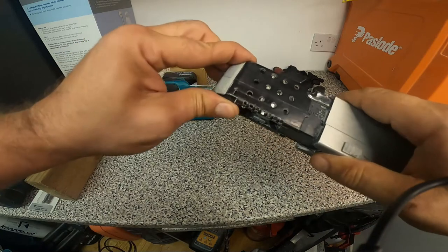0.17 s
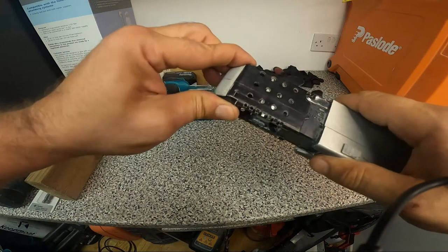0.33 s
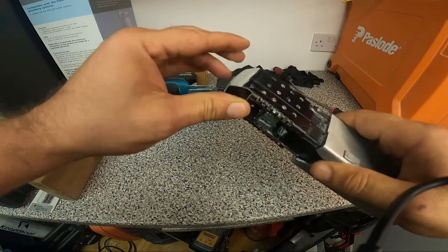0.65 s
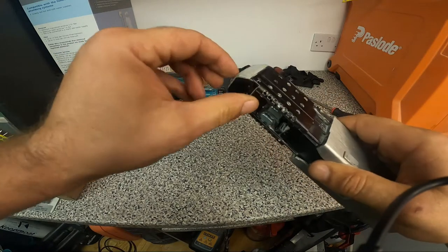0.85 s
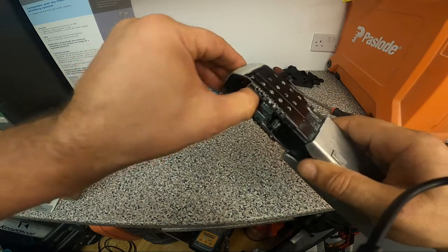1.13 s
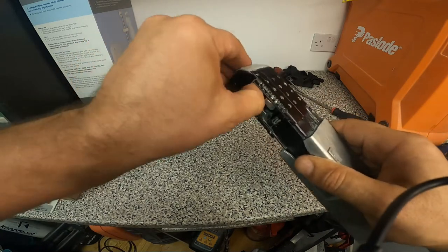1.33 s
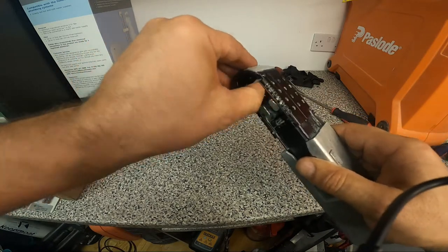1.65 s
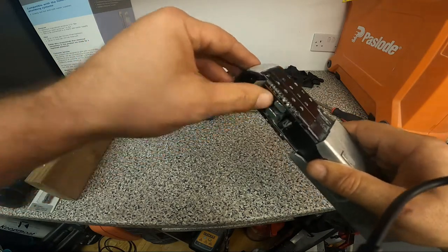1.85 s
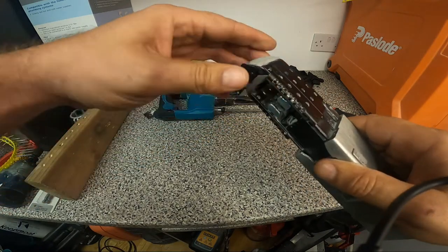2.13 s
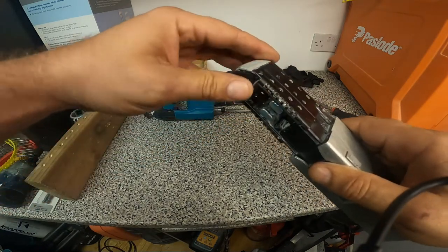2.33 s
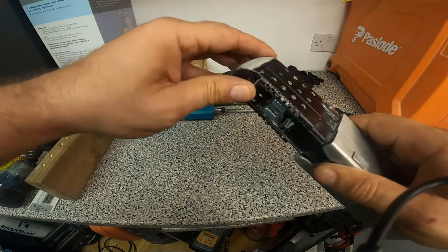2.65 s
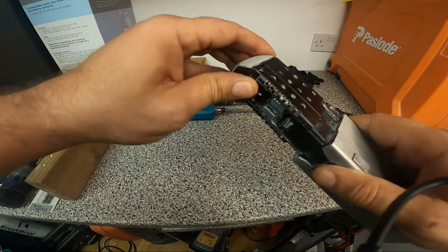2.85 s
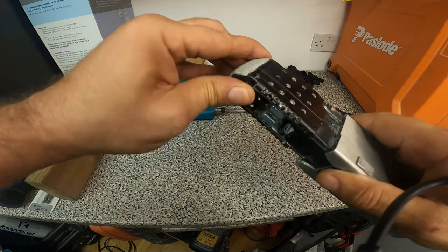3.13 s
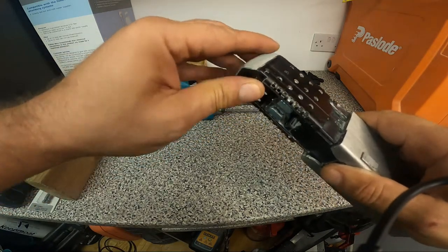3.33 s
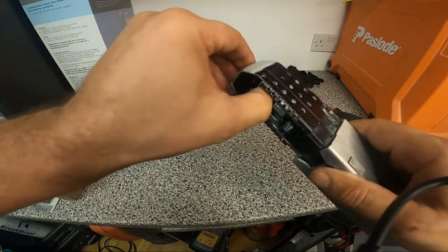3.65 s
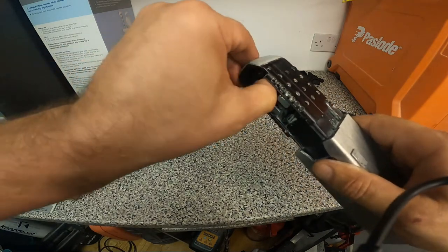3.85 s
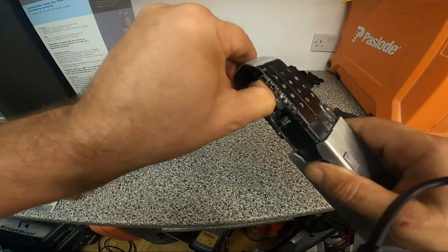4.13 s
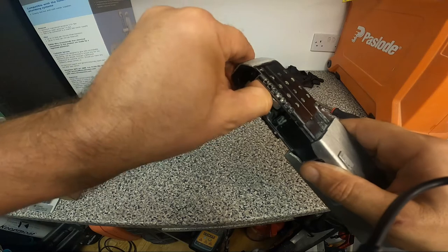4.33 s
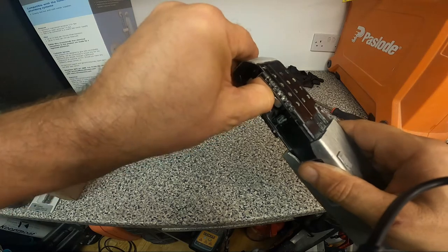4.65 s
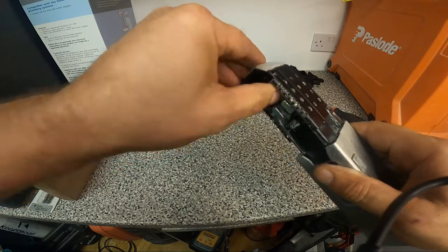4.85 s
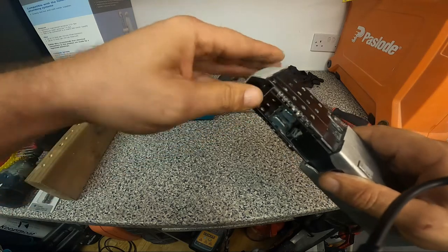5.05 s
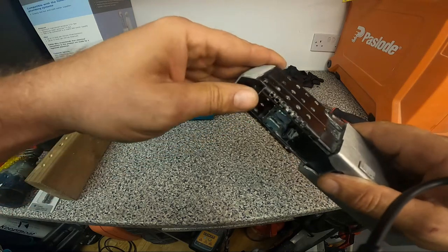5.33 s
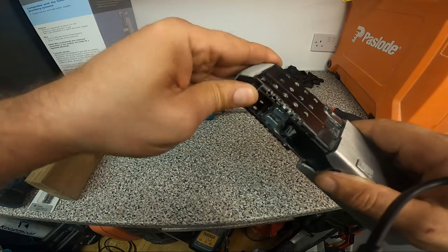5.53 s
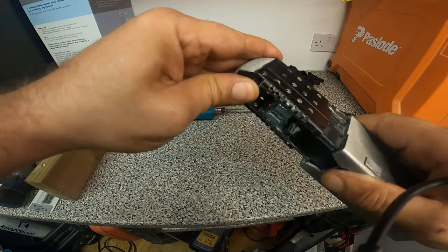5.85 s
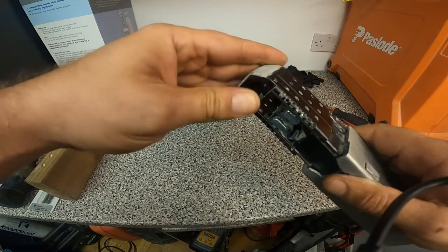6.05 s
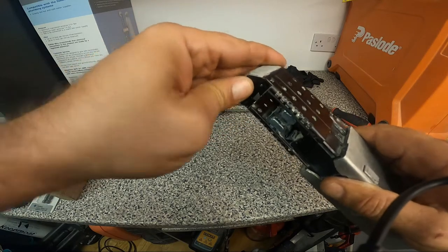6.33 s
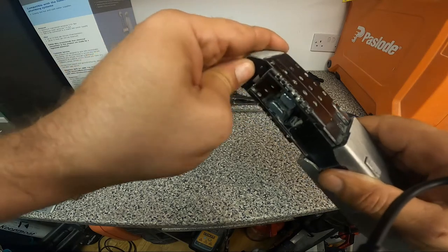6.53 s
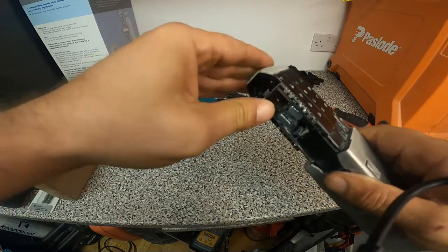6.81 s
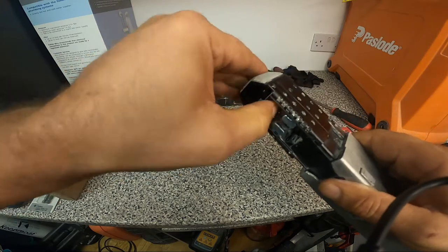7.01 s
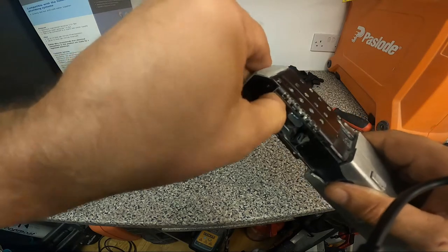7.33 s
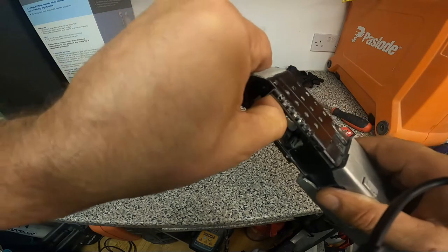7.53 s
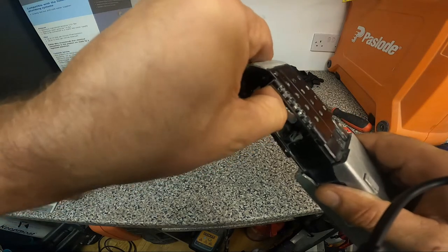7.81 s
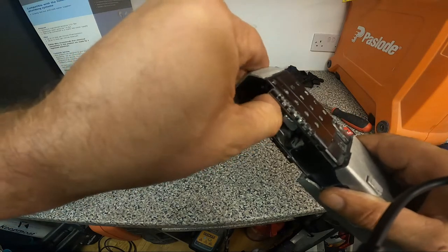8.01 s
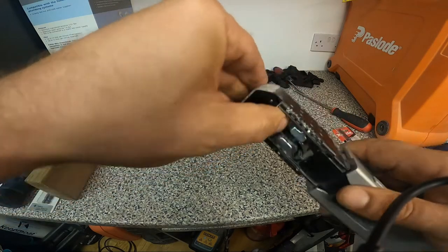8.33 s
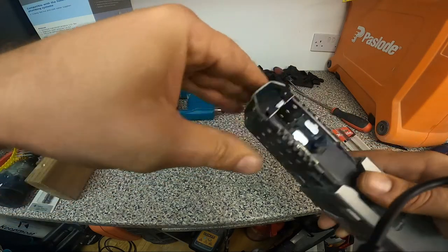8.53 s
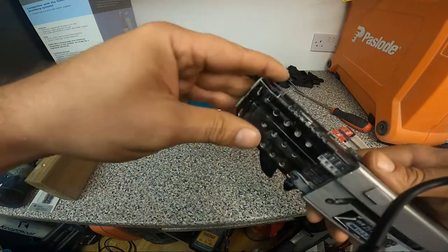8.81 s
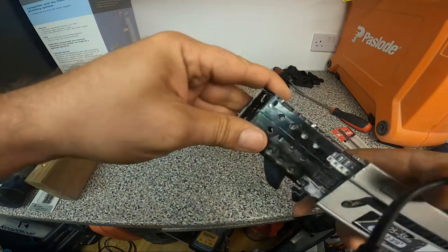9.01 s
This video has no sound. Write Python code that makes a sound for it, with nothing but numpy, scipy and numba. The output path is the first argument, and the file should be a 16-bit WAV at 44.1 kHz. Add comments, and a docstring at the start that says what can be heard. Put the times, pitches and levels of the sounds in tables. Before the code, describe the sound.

Close plastic clicks, taps and short scrapes as hands work a part into a tool housing, with a few sharp snaps over faint hum.

```python
"""A small workshop hums, with low rumble and a faint whine, while hands rub a tool housing close by.
A plastic part is worked into it: impacts excite the housing's modes as clicks and snaps, and stick-slip
friction excites them as scrapes. A loose pin pings, and a thin tone swells into each of the two biggest
snaps; a spring rings after the first, a low thump comes with the second. An automatic gain control
lowers the whole sound after loud snaps."""
import sys
import numpy as np
from scipy import signal
from scipy.fft import rfft, irfft, next_fast_len
from scipy.io import wavfile
from scipy.ndimage import uniform_filter1d
from numba import njit

SR = 44100
rng = np.random.default_rng(int(sys.argv[2]) if len(sys.argv) > 2 else 0)


def transcribe(signal):
    """Save signal, clipped to [-1, 1], as a 16-bit WAV file at the path in sys.argv[1]."""
    frames = np.atleast_2d(signal).T
    limited = np.clip(frames, -1, 1)
    pcm = np.round(limited * 32767).astype(np.int16)
    wavfile.write(sys.argv[1], SR, pcm)


N = 404389
T = np.arange(N) / SR

# Room hum and hiss: (frequency [Hz], relative spectral density [dB])
ROOM_SPECTRUM = [(12, -31.5), (20, -1.5), (48, -10), (93, -14.5), (172, 1.5), (247, -2.5), (915, -20),
                 (1210, -18), (4250, -29), (5160, -28.5), (5700, -33), (7800, -33), (8500, -38),
                 (15800, -51)]
# Course about which the rumble surges: (time [s], level [dB])
RUMBLE_LEVELS = [(0.0, -54.5), (1.81, -68), (1.94, -49.5), (2.6, -80.5), (2.93, -68.5), (3.06, -42),
                 (3.17, -67.5), (4.16, -49.5), (4.21, -61.5), (5.95, -53.5), (6.03, -70), (6.23, -50),
                 (7.05, -47.5), (7.15, -66), (7.59, -49), (7.69, -55), (9.04, -59.5), (9.17, -75)]
# Harmonics of the whine: (frequency [Hz], mean level [dB])
WHINE_PARTIALS = [(5190, -82), (10380, -104.5)]
# Hands shifting their grip: (time [s], level [dB])
GRIP_LEVELS = [(0.0, -66.5), (0.76, -86.5), (1.17, -65.5), (2.2, -80.5), (2.5, -89), (2.99, -63.5),
               (3.24, -90), (3.7, -69.5), (4.6, -76), (5.08, -61.5), (5.4, -76.5), (6.45, -73), (6.72, -66),
               (7.2, -64.5), (8.3, -77), (8.5, -64), (8.84, -56.5), (9.17, -75)]
# Normal modes of the housing: (frequency [Hz], relative level [dB], T60 [s])
HOUSING_MODES = [(224, 8, 0.036), (459, 3, 0.053), (636.3, -1.5, 0.072), (1096.3, -7, 0.04),
                 (1184.6, -2.5, 0.034), (1263.4, 2.5, 0.023), (1584, 1, 0.0077), (1788, 13.5, 0.0089),
                 (2095, -0.5, 0.019), (2326.4, -7, 0.016), (2661, -2, 0.0097), (2884, 3, 0.0072),
                 (3233, 0.5, 0.011), (3609, 0, 0.011), (3895, -1, 0.0089), (5130, -13.5, .006),
                 (5238, 3.5, 0.011), (5620, 16, 0.0031), (6100, -13, 0.015), (6400, -12.5, 0.0013),
                 (8100, 0.5, 0.0021), (8420, 2.5, 0.0027), (10486, 0, 0.0033), (12250, -2.5, 0.0026),
                 (13000, -1.5, 0.0018), (14600, -2.5, .0015)]
# Plastic striking plastic; shell, crack and thud are bands of the housing's modes:
# (time [s], level [dB], shell gain [dB], crack gain [dB], thud gain [dB], chatter decay [ms])
IMPACTS = [(0.2661, -37, -11, -10.5, -34, 2.8), (0.435, -41, 6, -24, -28.5, 8.1),
           (0.7314, -45.5, -4, -6, -9, 1.5), (0.754, -41.5, -10.5, -13.5, -26, 1.6),
           (1.5529, -14.5, -13, -23, -38, 8.1), (1.588, -24, -7, -24, -22, 1.64),
           (1.6174, 1.5, -12.5, -26, -31, 2.63), (1.7478, -41.5, -7, -16, -4.5, 2.4),
           (1.9092, -18, -9, -20, -23.5, 3.5), (1.946, -25, -9.5, -19, -32, 4.8),
           (1.9615, -21.5, 1, -30, -37, 6), (2.0643, -23.5, -15, -12, -29, 6.1),
           (2.1276, -33.5, -13, -8, -29, 3.6), (2.496, -33, -7.5, -12.5, -26, 2.66),
           (2.516, -24, -0.5, -33.5, -12.5, 2), (2.7656, -39.5, -30, -10, -33, 2.1),
           (2.803, -41, 4, -15, -4.5, 2.7), (2.8436, -14.5, -2, -14, -28, 4.7),
           (2.9855, -29.5, -14, -26, -25.5, 2.5), (3.0477, 1, -17, -16.5, -25.5, 1.18),
           (3.475, -26.5, -1, -18, -11.5, 2), (3.5362, -38, 0.5, -35, -13, 7.1),
           (3.6118, -48.5, -3, -18.5, -9.5, 4), (4.086, -44.5, 9.5, -40, -23.5, 4.5),
           (4.22, -46, -4, -26, -14, 1.2), (4.3333, -42.5, 1.5, -20.5, -20, 1.5),
           (4.4865, -40.5, -2, -27.5, -22, 2.7), (4.615, -39, 5.5, -21.5, -23, 2.7),
           (4.6766, -33.5, -2, -17.5, -33.5, 0.72), (4.773, -46, 3, -19, -16, 4.4),
           (4.7891, -40, -19, -5.5, -16, 6.4), (4.9435, -30, -16, -15.5, -35, 2.3),
           (5.0002, -23.5, -4.5, -20.5, -30, 14), (5.0426, -30.5, -9.5, -22.5, -25, 2.1),
           (5.1836, -22.5, 1, -33.5, -38.5, 2.8), (5.4736, -43.5, 7.5, -17.5, -12.5, 2.2),
           (5.5095, -22, 9.5, -44.5, -33, 3), (5.682, -40, 16.5, -33.5, 5, 1.9),
           (5.7116, -37, 8, -33.5, -25, 1.2), (5.7305, -38, 0, -35.5, -30, 3.4),
           (5.8372, -32.5, 3, -15.5, -21.5, 3.3), (5.9608, -39, -16, -10.5, -30.5, 1.8),
           (6.1262, -43, 7, -12.5, 0, 2), (6.1554, -27.5, 0.5, -37, -5.5, 1.37),
           (6.5068, -46.5, 0.5, -34, -26.5, 6.7), (6.5273, -30, 7, -36, 1.5, 3),
           (6.544, -23, 9, -23.5, -23, 2), (6.577, -8.5, -8, -14, -27, 2.5),
           (6.7402, -43.5, -4, -24.5, -19, 2.5), (6.8279, -20.5, 0, -11, -42, 2.6),
           (6.847, -34, -8, -15, -13, 4), (6.8828, -17, -5, -24, -12, 7.8),
           (6.9321, -29.5, 3.5, -37, 1.5, 2.4), (7.132, -29, -1, -24.5, -35, 1.4),
           (7.1513, -23, -1, -34.5, -54, 2.5), (7.236, -22, 2.5, -33.5, -15.5, 1.7),
           (7.415, -29, -3.5, -15.5, -29, 6.5), (7.6315, -25, -4.5, -15.5, -35.5, 5.5),
           (7.7743, -28, 7, -50.5, -3.5, 3), (8.0068, -51, 4.5, -29, -8.5, 2.8),
           (8.0658, -50.5, 7.5, -21, -6.5, 2.7), (8.1005, -48, -16, -4.5, -15, 2.4),
           (8.2656, -25, 2, -42, -6, 1.14), (8.4458, -36, 8, -25, -17.5, 1.9),
           (8.4764, -32.5, -2, -30, -30.5, 3.1), (8.4893, -23.5, -1, -29, -31, 6.2),
           (8.5005, -16, 6, -38.5, -28, 3.1), (8.513, -18, -10, -23.5, -36, 7.1),
           (8.536, -15, -5, -26, -30, 6.6), (8.588, -14.5, -6.5, -18, -37, 5),
           (8.6014, -25.5, -14, -29, -16, 2.2), (8.6617, -33, -4, -10, -32, 3.9),
           (8.6951, -37, -5, -24, -20, 2.1)]
# Modes of the loose pin: (frequency [Hz], relative level [dB], T60 [s])
PIN_MODES = [(2850, 13, 0.095), (3830, -23, 0.059), (4255, -1.5, 0.18), (5250, -2.5, 0.11)]
# Touches on the pin: (time [s], level [dB], frequency factor [ratio])
PIN_STRIKES = [(0.267, -45.5, 0.85), (4.49, -59, 0.98), (4.613, -50.5, 1), (4.671, -39, 1),
               (4.791, -38.5, 1.0)]
# Slides over the housing: (start [s], duration [s], level [dB], shell gain [dB])
SLIDES = [(0.707, 0.077, -47, -7.5), (0.956, 0.19, -54, -11), (1.104, 0.11, -53, -27),
          (1.2, 0.18, -43.5, -20), (1.518, 0.19, -30.5, -3), (1.872, 0.13, -36, -8.5),
          (1.983, 0.14, -33.5, -1.5), (2.104, 0.036, -42.5, -2), (2.436, 0.069, -37.5, -8),
          (2.472, 0.067, -25, -3.5), (2.725, 0.28, -46.5, -14.5), (3.441, 0.1, -41, -2),
          (3.723, 0.19, -51.5, -8.5), (3.848, 0.085, -45.5, -5), (4.902, 0.098, -48.5, -8.5),
          (5.038, 0.087, -43.5, -14.5), (5.138, 0.14, -41, 0), (5.466, 0.13, -42.5, 1),
          (5.661, 0.13, -43.5, 0), (5.805, 0.065, -44, -6), (5.876, .13, -47, -9), (6.08, 0.18, -41.5, -4),
          (6.513, 0.16, -29.5, -2.5), (6.713, 0.058, -46.5, -9.5), (6.823, .14, -27.5, -1),
          (7.096, 0.097, -36, -7.5), (7.357, 0.14, -47.5, -3), (7.611, 0.059, -38.5, -8),
          (8.037, 0.15, -55, -5.5), (8.242, 0.073, -36.5, 5.5), (8.436, 0.075, -35.5, 4),
          (8.48, 0.065, -27, -1), (8.554, 0.076, -22.5, -0.5), (8.606, 0.1, -40, -20),
          (8.691, 0.17, -29.5, -10.5), (8.83, 0.18, -41.5, -13), (8.956, 0.18, -44.5, -13),
          (9.127, 0.11, -31.5, -8)]
# Tones growing into the snaps:
# (end [s], frequency [Hz], level [dB], relative level of the low partial [dB], growth time [ms])
SWELLING_TONES = [(1.6174, 4213, -8.5, -13.5, 7.3), (3.048, 4200, -16, -10, 7.0)]
# Modes of the spring: (frequency [Hz], relative level [dB], T60 [s])
SPRING_MODES = [(655, -20, .4), (689, -15, .5), (724, -18, .45), (1965, -1, .27), (2347, -6, .32),
                (3542, -19, .2), (6385, -27, .26)]
# Blow to the spring: (time [s], level [dB])
SPRING_STRIKES = [(1.62, -27)]
# Hiss in the difference of the two channels: (frequency [Hz], relative spectral density [dB])
SIDE_SPECTRUM = [(12, -47), (20, -19), (586, -3.5), (732, -12), (3300, -9.5), (5620, -3.5),
                 (10100, -13.5), (12300, -7.5), (15800, -1)]


def undb(db):
    """Amplitude ratio of a level in decibels."""
    return 10 ** (np.asarray(db) / 20)


def unit(x):
    """Normalisation to an rms of 1."""
    return x / np.sqrt(np.mean(x ** 2))


def decay(t, t60):
    """Exponential damping: 60 dB lost in t60 seconds."""
    return np.exp(-np.log(1000) * t / t60)


def coloured(spectrum):
    """Spectral shaping of white noise, at an rms of 1."""
    size = next_fast_len(N)
    hz, db = np.transpose(spectrum)
    bin_hz = np.arange(size // 2 + 1) * SR / size
    gain = undb(np.interp(np.log(bin_hz + 1), np.log(hz), db))
    return unit(irfft(rfft(rng.standard_normal(size)) * gain, size)[:N])


def wander(rate_hz):
    """Random modulation: smoothed Gaussian steps with a spread near 1."""
    hold = int(SR / rate_hz)
    steps = np.repeat(rng.standard_normal(N // hold + 1), hold)
    return uniform_filter1d(uniform_filter1d(steps, hold), hold // 2)[:N]


def ring(hz, db, t60, size, rise_cycles):
    """Modal synthesis: a sum of damped sines, each rising over some cycles as under a soft contact."""
    t, hz = np.arange(size) / SR, hz[:, None]
    onset = (1 - np.exp(-t * hz / rise_cycles)) ** 2
    return undb(db) @ (onset * decay(t, t60[:, None]) * np.sin(2 * np.pi * hz * t))


def add(out, start, sound, peak_db):
    """Superposition: mixes a sound in at a start time and peak level."""
    i = int(start * SR)
    out[i:i + len(sound)] += (sound * undb(peak_db) / np.abs(sound).max())[:N - i]


def room_hum():
    """Stationary noise, densest at low frequencies, is heard as hum and hiss."""
    return undb(-61) * coloured(ROOM_SPECTRUM)


def rumble(surge_db=4, surges_per_s=9):
    """Amplitude modulation of low band-limited noise gives irregular surges."""
    band = signal.butter(4, [18, 47], "band", fs=SR, output="sos")
    noise = signal.sosfilt(band, rng.standard_normal(N))
    surges = undb(surge_db * wander(surges_per_s))
    return undb(np.interp(T, *np.transpose(RUMBLE_LEVELS))) * unit(surges * noise)


def whine():
    """Random frequency and amplitude modulation make a thin tone and its octave waver."""
    phase_per_hz = 2 * np.pi * np.cumsum(1 + .0015 * wander(120)) / SR
    return sum(undb(db + 3 * wander(60)) * np.sqrt(2) * np.sin(hz * phase_per_hz)
               for hz, db in WHINE_PARTIALS)


def housing(force, shell_db, crack_db, air_db, thud_db):
    """Forced response: force convolved with the modes, whose strengths depend on the point of contact."""
    hz, db, t60 = np.transpose(HOUSING_MODES)
    detune, scatter = rng.standard_normal((2, len(hz)))
    band_db = np.select([hz < 900, hz < 2200, hz < 4900, hz < 8200],
                        [thud_db, shell_db, 0, crack_db], air_db)
    response = ring(hz * (1 + .031 * detune), db + band_db + 1.8 * scatter, t60, 2048, rise_cycles=1.2)
    return signal.fftconvolve(force, response)


def friction():
    """Stick-slip friction: dense, uneven slips make a noise force of fluctuating strength."""
    return rng.standard_normal(N) * undb(4 * wander(500) + 3 * wander(70))


def rubbing():
    """Friction of the gripping hands drives the housing faintly and continuously."""
    vibration = housing(friction(), shell_db=0, crack_db=-8.5, air_db=-5.5, thud_db=-13.5)[:N]
    return undb(np.interp(T, *np.transpose(GRIP_LEVELS))) * unit(vibration)


def clicks(max_chatter_ms=9, rattle_db=-21.5):
    """Impact excitation: a chattering contact strikes the housing, then loose parts rattle all over it."""
    out, t = np.zeros(N), np.arange(-192, 4928) / SR
    for time, db, shell_db, crack_db, thud_db, chatter_ms in IMPACTS:
        air_db = crack_db - 10 + .2 * db  # harder contacts are brighter
        chatter = np.where(t < 0, .35 * np.exp(t / .002),
                           np.exp(-t * 1000 / min(chatter_ms, max_chatter_ms)))
        force = chatter * rng.standard_normal(len(t)) + 4.4 * (t == 0)
        strike = housing(force, shell_db, crack_db, air_db, thud_db)
        loose_force = (t > 0) * np.exp(-t / .018) * rng.standard_normal(len(t))
        # scattered contacts give a more even colour
        rattle = housing(loose_force, .33 * shell_db, .41 * crack_db, .26 * air_db, thud_db)
        add(out, time + t[0], strike + undb(rattle_db) * rattle, db)
    return out


def pin_pings():
    """Free vibration: a loose pin rings in inharmonic modes when touched."""
    out = np.zeros(N)
    hz, mode_db, t60 = np.transpose(PIN_MODES)
    for time, db, pitch in PIN_STRIKES:
        scatter_db = 1.5 * rng.standard_normal(len(hz))
        add(out, time, ring(hz * pitch, mode_db + scatter_db, t60, size=6144, rise_cycles=2), db)
    return out


def scrapes(rise_share=.42, turned_over_s=8.4):
    """Sliding friction of skin and plastic drives the housing in short strokes that swell and fade."""
    out, slips = np.zeros(N), friction()
    for start, duration, db, shell_db in SLIDES:
        loudest, end = start + rise_share * duration, start + duration
        span = np.arange(int(start * SR), int(end * SR))
        arch = np.sin(np.interp(span / SR, [start, loudest, end], [0, np.pi / 2, np.pi])) ** 1.5
        thud_db = -12 + 1.47 * shell_db  # slides that excite the shell excite the low modes too
        if start > turned_over_s:
            thud_db -= 8.5  # the housing is no longer pressed into the hand
        force = arch * slips[span % N]
        add(out, start, housing(force, shell_db, crack_db=-11, air_db=-17.5, thud_db=thud_db), db)
    return out


def swelling_tones():
    """Exponential growth: two close wavering partials and one near half their pitch rise into a snap."""
    out, t = np.zeros(N), np.arange(-2048, 128) / SR
    for end, hz, db, low_db, growth_ms in SWELLING_TONES:
        tone = np.zeros(len(t))
        for ratio, partial_db in ((.975, 0), (1.04, -5), (.47, low_db)):
            cycles = ratio * hz * t + rng.random() + .15 * wander(160)[:len(t)]
            tone += undb(partial_db) * np.sin(2 * np.pi * cycles)
        envelope = np.where(t < 0, np.exp(t * 1000 / growth_ms), np.exp(-t / .00075))
        add(out, end + t[0], tone * envelope, db)
    return out


def spring_ring():
    """Light damping lets the spring's modes sing on after the biggest snap."""
    out = np.zeros(N)
    for time, db in SPRING_STRIKES:
        add(out, time, ring(*np.transpose(SPRING_MODES), size=16384, rise_cycles=17), db)
    return out


def thump(time_s=3.049, hz=52, t60_s=.16):
    """A damped oscillation of one low mode sounds as a thump with the second big snap."""
    out = np.zeros(N)
    add(out, time_s, ring(np.array([hz]), [0], np.array([t60_s]), size=8192, rise_cycles=.2), -33)
    return out


def reverberation(direct, bench_t60_s=.085, walls_t60_s=.26):
    """Diffuse reflection: a short tail from the bench and a slower, weaker one from the walls."""
    t = np.arange(SR // 3) / SR
    envelope = decay(t, bench_t60_s) + undb(-14.5) * decay(t, walls_t60_s)
    tail = rng.standard_normal(len(t)) * envelope * np.minimum(t / .011, 1)
    return signal.fftconvolve(direct, tail / np.sqrt(np.sum(tail ** 2)))[:N]


def microphone_pair(mid):
    """Mid-side stereo: two close ports differ mainly in the top treble, where the right hears more."""
    treble = signal.sosfiltfilt(signal.butter(4, 10500, "high", fs=SR, output="sos"), mid)
    side = 1.1 * np.gradient(treble) - .37 * treble
    side += undb(-87) * coloured(SIDE_SPECTRUM) + undb(-54.5) * np.roll(mid, shift=40)
    return np.array([mid + side, mid - side])


def scene():
    """Superposition of the handling sounds, their reflections, the metal parts and the background."""
    near = clicks() + swelling_tones() + rubbing() + scrapes()
    metal = (pin_pings() + spring_ring()) * undb(3 * wander(110))  # loose seats damp the rings unevenly
    background = room_hum() + rumble() + whine()
    return microphone_pair(near + undb(-14) * reverberation(near) + metal + thump() + background)


@njit
def follow(x, attack_s, release_s):
    """Envelope detection: a one-pole smoother with separate rise and fall time constants."""
    envelope, level = np.empty(len(x)), 0.
    for i in range(len(x)):
        level += (x[i] - level) / (SR * (attack_s if x[i] > level else release_s))
        envelope[i] = level
    return envelope


def record(dry, cutoff_hz=15800):
    """Automatic gain control ducks after loud sounds, longest after hard peaks; then clip and low-pass."""
    rectified = np.abs(dry[0])
    loudness = follow(rectified, attack_s=.054, release_s=.25)
    peaks = follow(rectified, attack_s=.0058, release_s=.6)
    held_peaks = follow(peaks, attack_s=.15, release_s=.15)
    gain = (1 + loudness / undb(-33)) ** -.25 * (1 + held_peaks / undb(-22.5)) ** -.3
    clipped = np.clip(dry * gain * undb(1.5), -.9, .9)
    return signal.sosfilt(signal.ellip(10, .2, 80, cutoff_hz, fs=SR, output="sos"), clipped)


dry = scene()
out = record(dry)
transcribe(out)
```